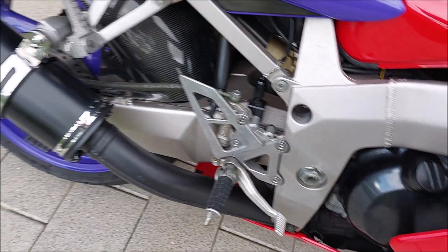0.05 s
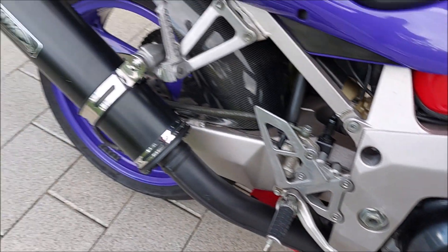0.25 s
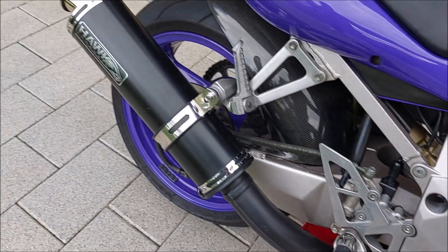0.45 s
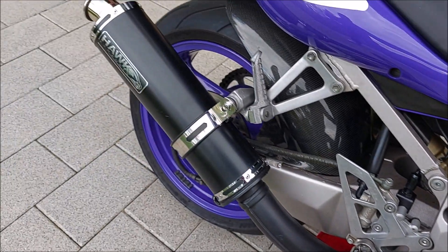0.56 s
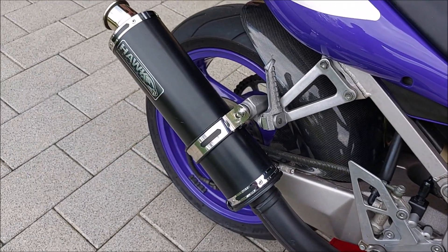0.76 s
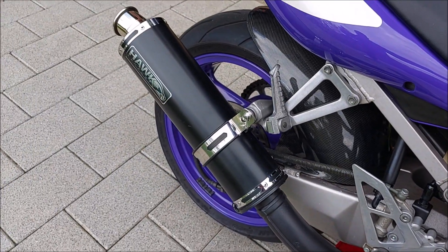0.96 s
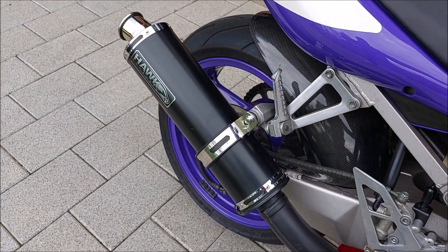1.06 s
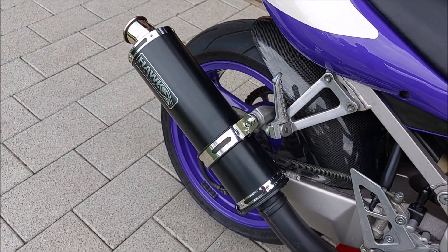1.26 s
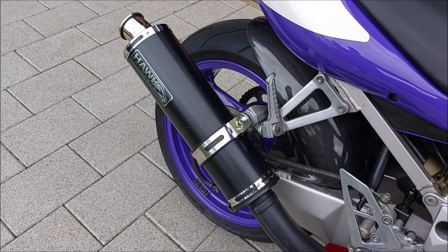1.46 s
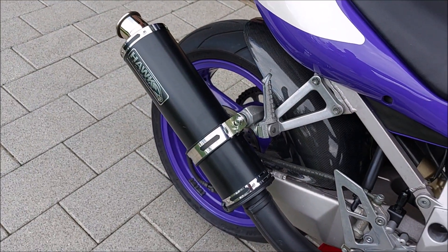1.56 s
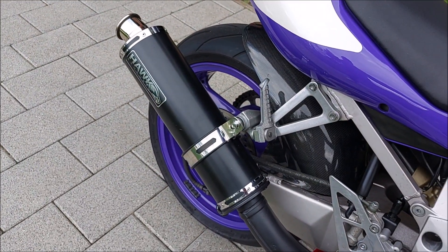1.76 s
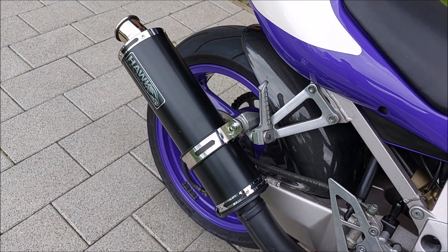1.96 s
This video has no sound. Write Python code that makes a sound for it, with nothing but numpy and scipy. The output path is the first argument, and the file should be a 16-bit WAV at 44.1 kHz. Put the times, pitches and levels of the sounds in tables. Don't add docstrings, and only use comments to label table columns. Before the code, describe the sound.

A motorcycle exhaust falls from a throttle blip into a lumpy, thumping idle, then grows louder as the stereo microphone nears the tail pipe outdoors on a paved yard, ending with a sudden rev.

```python
import sys
import numpy as np
from scipy import signal
from scipy.io import wavfile
from scipy.ndimage import uniform_filter1d

SR = 44100
rng = np.random.default_rng(int(sys.argv[2]) if len(sys.argv) > 2 else 0)


def persist_wave(psi):
    counts = np.round(np.clip(psi, -1, 1) * 32767).astype(np.int16)
    wavfile.write(sys.argv[1], SR, np.atleast_2d(counts).T)


def ratio(d):
    e = np.asarray(d, float) / 20
    return 10 ** e


N = 88200
RUN_IN = 2000


def rms_one(x):
    return x / np.sqrt(np.mean(x ** 2) + 1e-20)


def stereo_gain(left_db, right_db):
    return ratio(np.array([[left_db], [right_db]]))


def at_hz(points, hz):
    table_hz, level = np.array(points).T
    return np.interp(np.log(hz), np.log(np.maximum(table_hz, 1)), level)


def over_time(points, s):
    return np.interp(s, *np.transpose(points))


def drift(rate):
    r = np.exp(-80 * np.pi * rate / SR)
    chance = rng.standard_normal(N // 40 + 2002)
    slow = rms_one(signal.lfilter([1], [1, -2 * r, r * r], chance)[2000:])
    return np.interp(np.arange(N) / 40, np.arange(len(slow)), slow)


def clicks(s, height):
    out = np.zeros(N + 8000)
    place = np.clip((s * SR).astype(int) + RUN_IN, 0, N + 7999)
    np.add.at(out, place, height)
    return out


def swell(train, hz, build_s, order=1):
    t = np.arange(12000) / SR
    envelope = (t / build_s * np.exp(1 - t / build_s)) ** order
    ring = -np.cos(2 * np.pi * hz * t) * envelope
    return signal.fftconvolve(train, ring)[RUN_IN:N + RUN_IN]


# (time [s], level of cylinders 1, 2, 3, 4 [dB])
RUN_DOWN = [
    (-0.002, -38, -29, -22, -25),
    (0.0497, -21, -24, -26, -28),
    (0.1032, -27, -24, -30, -23),
    (0.1575, -29, -35, -29, -35),
    (0.2205, -20, -30, -26, -23),
    (0.2895, -36, -39, -28, -38),
    (0.3538, -23, -27, -27, -25),
    (0.4285, -25, -30, -29, -26),
    (0.5076, -22, -22, -28, -24),
]
# (time [s], level of cylinders 1, 2, 3, 4 [dB])
IDLE = [(0.595, -22, -24, -32, -24), (0.6923, -22, -27, -28, -27), (0.7959, -20, -20, -30, -23),
        (0.8888, -14, -16, -27, -20), (0.9764, -15, -29, -32, -24), (1.0699, -13, -16, -22, -20),
        (1.16, -15, -18, -29, -17), (1.2418, -13, -21, -26, -21), (1.3319, -12, -13, -23, -15),
        (1.4172, -11, -18, -25, -14), (1.5013, -13, -21, -27, -17), (1.5881, -13, -12, -22, -17),
        (1.6732, -12, -17, -23, -16), (1.7558, -14, -22, -25, -16), (1.8411, -12, -13, -22, -15),
        (1.9233, -9, -9, -10, -11), (1.9821, -9, -9, -9, -9)]
CYLINDER_LAG_S = [.0001, -.0003, .001, .0003]


def firings():
    last_cycle_s, jitter_s = .045, .0003
    rows = np.array(RUN_DOWN + IDLE)
    start = np.append(rows[:, 0], rows[-1, 0] + last_cycle_s)
    length = np.diff(start)[:, None]
    slope = np.gradient(start)[:, None]
    u = np.arange(4) / 4
    bend = u * (1 - u) * ((1 - u) * (slope[:-1] - length) - u * (slope[1:] - length))
    jitter = jitter_s * rng.standard_normal((len(rows), 4))
    s = start[:-1, None] + u * length + bend + CYLINDER_LAG_S + jitter
    return s.ravel(), rows[:, 1:].ravel()


def unevenness(db):
    return db - uniform_filter1d(db, size=8)


def silencer(s, db, modes, starts, steepness, scatter_db, order, db_per_octave):
    full_db, idle_per_s = 5, 48
    chance = rng.standard_normal((len(s), len(modes)))
    weakness_db = unevenness(db) - full_db
    octaves = np.maximum(np.log2(1 / np.gradient(s) / idle_per_s), 0)
    out = 0
    for k, (hz, build_s, left_db, right_db) in enumerate(modes):
        height_db = db + (steepness[k] - 1) * weakness_db + db_per_octave[k] * octaves
        train = clicks(s + starts[k], ratio(height_db + scatter_db * chance[:, k]))
        out = out + stereo_gain(left_db, right_db) * swell(train, hz, build_s, order)
    return out


# (pitch [Hz], build-up [s], left level [dB], right level [dB])
BARK = [(278, .0042, -7, -30), (239.5, .0042, -5.3, -1.3), (234, .023, -24, -16), (434, .0024, -8.5, -11.5),
        (575, .0023, -18, -22), (800, .0016, -33, -33)]
BARK_START_S = [-.0043, -.0041, -.0039, -.0024, -.0025, -.0014]
BARK_STEEPNESS = [1.3, 1.0, .9, 1.6, 1.7, 2.0]
BARK_DB_PER_OCTAVE = [-2, -2, 0, 4, 12, 8]


def bark(s, db):
    return silencer(s, db - .33, BARK, BARK_START_S, BARK_STEEPNESS,
                    scatter_db=.8, order=2, db_per_octave=BARK_DB_PER_OCTAVE)


# (pitch [Hz], build-up [s], left level [dB], right level [dB])
THUMP = [(97.2, .013, -10.5, -9), (32.5, .0061, -7.2, -6), (144, .0058, -11, -10)]
THUMP_START_S = [-.0007, .0092, .001]
THUMP_DB_PER_OCTAVE = [0, 7, -6]
THUMP_BY_CYLINDER_DB = [-1.1, 0.72, -0.032, 0.14]
# (time [s], level [dB])
FLOW = [(0, -20), (.07, -14.5), (.14, -24.5), (.2, -13.5), (.29, -37), (.36, -22.5), (.43, -32.5),
        (.7, -25), (.9, -23.5), (1.1, -18), (1.22, -20.5), (1.32, -18.5), (1.45, -15.5), (1.6, -19),
        (1.72, -19), (1.88, -16), (2, -3.5)]


def thump(s, db):
    height_db = over_time(FLOW, s) + .2 * unevenness(db) + np.resize(THUMP_BY_CYLINDER_DB, len(s))
    surge = silencer(s, height_db, THUMP, THUMP_START_S, [1, 1, 1],
                     scatter_db=2.0, order=1, db_per_octave=THUMP_DB_PER_OCTAVE)
    packing_top_hz = 260
    return signal.sosfiltfilt(signal.butter(2, packing_top_hz, fs=SR, output="sos"), surge)


# (pitch [Hz], correlation [-1 to 1])
LIKENESS = [(60, .995), (130, .96), (290, .8), (640, .7), (1100, .55), (2500, .35), (15000, .2)]
# (pitch [Hz], left minus right [dB])
HISS_BALANCE = [(60, 7), (400, -7), (1200, 3), (3000, -3), (8000, 0), (14000, -8)]


def banded_noise(spectrum, low_hz, high_hz, patchy_db):
    together = drift(27)
    edges = np.geomspace(low_hz, high_hz, int(np.log2(high_hz / low_hz) * 4) + 1)
    white = rng.standard_normal((2, 2, N))
    out = 0
    for k, (low, high) in enumerate(zip(edges, edges[1:])):
        band = signal.butter(2, [low, high], "band", fs=SR, output="sos")
        mid, side = signal.sosfilt(band, white[k % 2])
        hz = np.sqrt(low * high)
        alike = np.clip(at_hz(LIKENESS, hz), -1, 1)
        gain = ratio(at_hz(spectrum, hz) + patchy_db * (2.04 * together + drift(30)))
        half_db = .5 * at_hz(HISS_BALANCE, hz)
        pair = np.sqrt(1 + alike) * mid + np.sqrt(1 - alike) * side * [[1], [-1]]
        out = out + gain * stereo_gain(half_db, -half_db) * pair
    return out / np.sqrt(np.mean(out ** 2))


def puffs(s, weight, build_s, depth):
    gate = -swell(clicks(s, weight), 0, build_s)
    return 1 + depth * (gate / gate.mean() - 1)


# (pitch [Hz], level per Hz [dB])
HISS = [(290, -53), (500, 0.5), (555, -10.5), (883, -14), (1080, -9), (1810, -13.5), (2540, -17.5),
        (3270, -22), (5100, -23.5), (8000, -31)]


def hiss(s, uneven_db):
    gate = puffs(s, ratio(.6 * uneven_db), build_s=.009, depth=.3)
    return ratio(3.5) * gate * banded_noise(HISS, 450, 8000, patchy_db=.45)


# (pitch [Hz], level per Hz [dB])
SIZZLE = [(4710, -33), (8000, -5), (9430, -17), (10500, -5), (12900, -13), (15100, -2.5), (15800, -10)]


def sizzle(s, uneven_db):
    gate = puffs(s, ratio(.7 * uneven_db), build_s=.011, depth=.5)
    return ratio(-12.5) * gate * banded_noise(SIZZLE, 8000, 15800, patchy_db=.5)


# (pitch [Hz], width [Hz], level [dB])
CASING = [(1040, 60, -10), (600, 50, -11), (1330, 60, -17), (1940, 80, -20), (2500, 200, -16)]


def casing():
    out = 0
    for hz, width_hz, level_db in CASING:
        r = np.exp(-np.pi * width_hz / SR)
        poles = [1, -2 * r * np.cos(2 * np.pi * hz / SR), r * r]
        noise = rng.standard_normal((2, N)) + rng.standard_normal(N)
        once = signal.lfilter([1, 0, -1], poles, noise)
        twice = signal.lfilter([1, 0, -1], poles, once)
        out = out + ratio(level_db + 2.0 * drift(0.9)) * rms_one(twice)
    return out


def gas_flow(s, db):
    uneven_db = unevenness(db)
    gas = hiss(s, uneven_db) + sizzle(s, uneven_db) + casing()
    left_lag_s = .0003
    return np.array([np.roll(gas[0], int(left_lag_s * SR)), gas[1]])


def rattle():
    clicks_per_s = 1000
    pitches = np.geomspace(1000, 6500, 14)
    sizes = ratio(6.4 * np.minimum(rng.exponential(1, N), 4))
    sizes = sizes * (rng.random(N) < clicks_per_s / SR)
    dealt = rng.integers(0, 14, N)
    t = np.arange(600) / SR
    out = np.zeros((2, N))
    for k, hz in enumerate(pitches):
        ring = ratio(at_hz(HISS, hz)) * hz * np.sin(2 * np.pi * hz * t) * np.exp(-t * hz)
        out[k % 2] += signal.fftconvolve(sizes * (dealt == k), ring)[:N]
    return ratio(-13) * rms_one(out)


# (pitch [Hz], level per Hz [dB])
RUMBLE = [(18, -37), (30, -23), (113, 23.5), (133, -7.5), (167, 6), (229, 7), (363, -31), (600, -32),
          (780, -55), (1320, -120)]


def rumble(near_db):
    level_db = -36.5 + .8 * (near_db - near_db.mean())
    return ratio(level_db) * banded_noise(RUMBLE, 35, 450, patchy_db=2.5)


# (time [s], level [dB], pitch [Hz], build-up [s])
POPS = [
    (.3135, -23, 103, .012),
    (.0156, -30, 237, .018),
    (.059, -29, 225, .028),
]


def pops():
    out = 0
    for s, level_db, hz, build_s in POPS:
        out = out + swell(clicks(np.array([s]), ratio(level_db)), hz, build_s)
    return out


# (time [s], pitch [Hz], left level [dB], right level [dB], 60 dB decay [s])
TICK = [
    (1.119, 2680, -33, -43, .03),
    (1.1225, 2510, -40, -35, .04),
    (1.118, 3650, -50, -41, .025),
    (.125, 1900, -45, -45, .07),
    (.345, 1450, -51, -51, .3),
    (.39, 1420, -49, -49, .2),
    (.652, 1030, -44, -46, .08),
]


def tick():
    out, t = np.zeros((2, N)), np.arange(N) / SR
    for s, hz, left_db, right_db, t60 in TICK:
        u = np.maximum(t - s, 0)
        ring = np.sin(2 * np.pi * hz * u) * (1 - np.exp(-u / .001))
        out += stereo_gain(left_db, right_db) * ratio(-60 * u / t60) * ring
    return out


# (time [s], level [dB])
NEAR = [(0, -44.5), (.07, -49.5), (.15, -49.5), (.3, -50), (.6, -50.5), (.8, -48.5), (1.05, -47.5),
        (1.35, -44), (1.86, -44.5), (1.93, -41), (2, -42.5)]


def scene():
    s, db = firings()
    near_db = over_time(NEAR, np.arange(N) / SR)
    exhaust = bark(s, db) + thump(s, db) + pops()
    gas = gas_flow(s, db)
    low = rumble(near_db)
    return exhaust + low + tick() + ratio(near_db) * (gas + rattle())


def top_cut(x):
    return signal.sosfilt(signal.butter(12, 15900, fs=SR, output="sos"), x)


def record(dry):
    cut = signal.sosfilt(signal.butter(2, 34.0, "high", fs=SR, output="sos"), dry)
    return top_cut(1.332 * np.tanh(cut / 1.207))


dry = scene()
out = record(dry)
persist_wave(out)
```